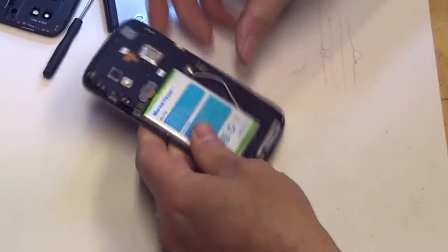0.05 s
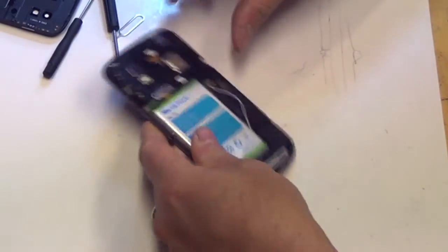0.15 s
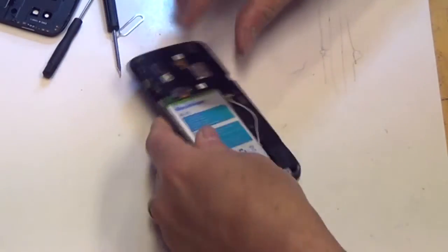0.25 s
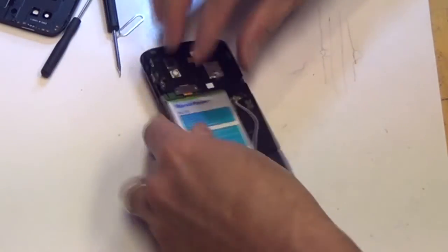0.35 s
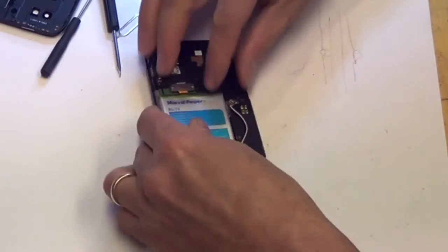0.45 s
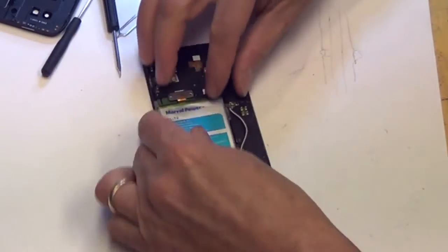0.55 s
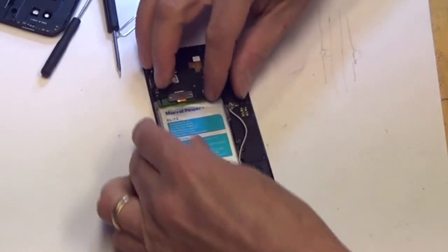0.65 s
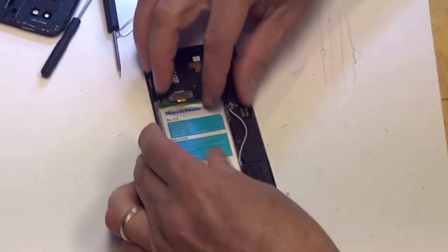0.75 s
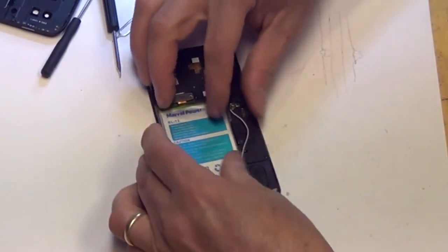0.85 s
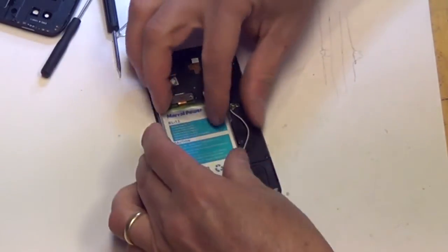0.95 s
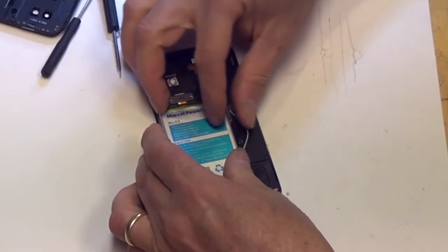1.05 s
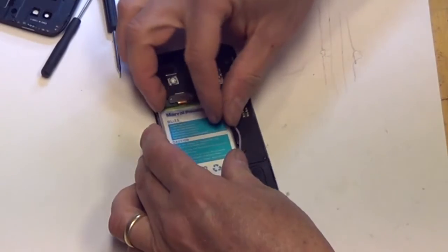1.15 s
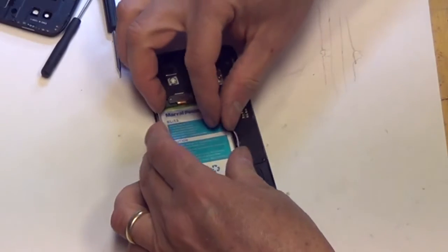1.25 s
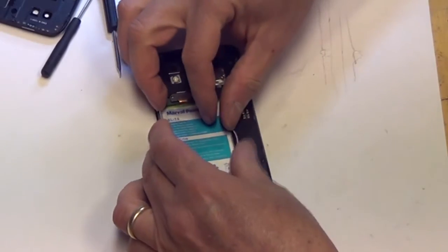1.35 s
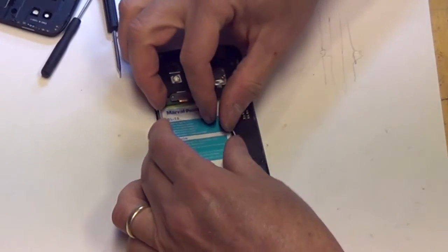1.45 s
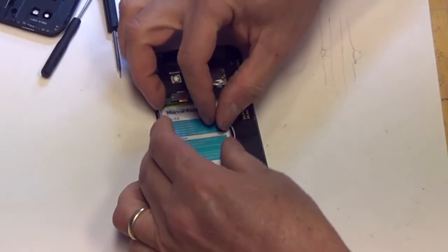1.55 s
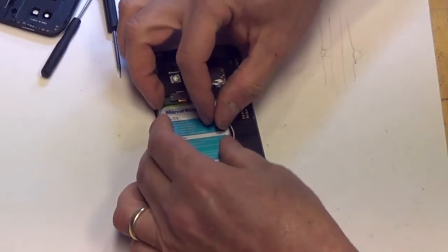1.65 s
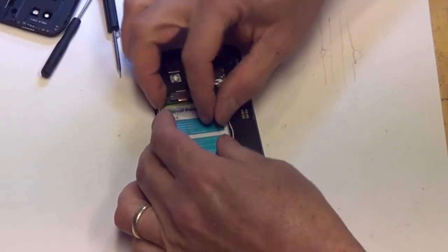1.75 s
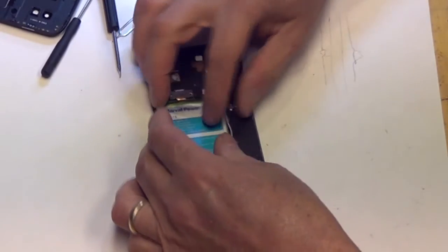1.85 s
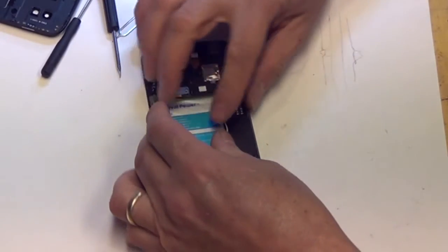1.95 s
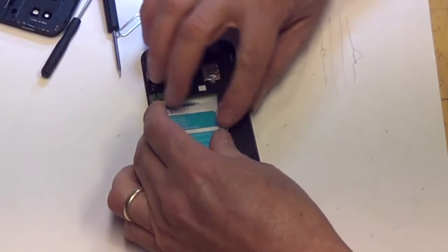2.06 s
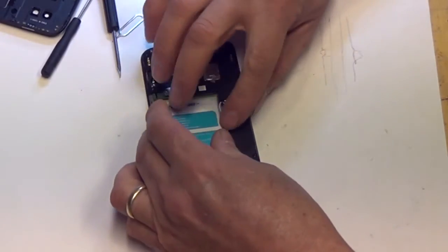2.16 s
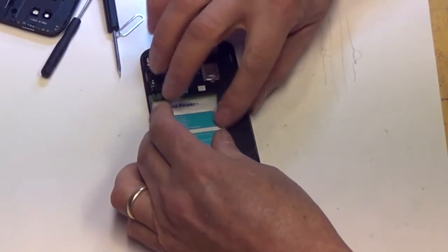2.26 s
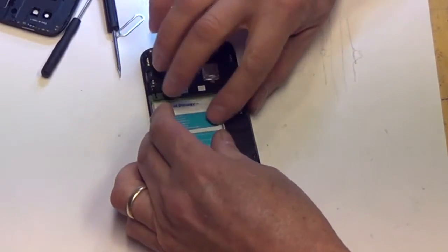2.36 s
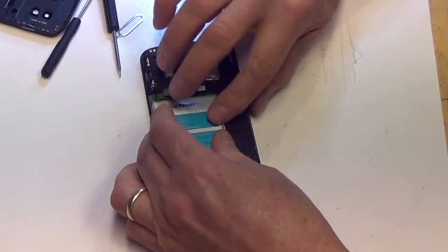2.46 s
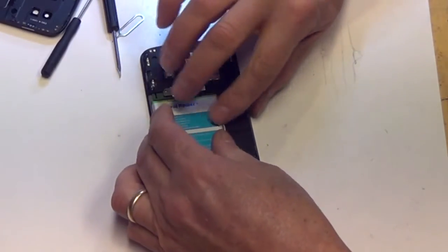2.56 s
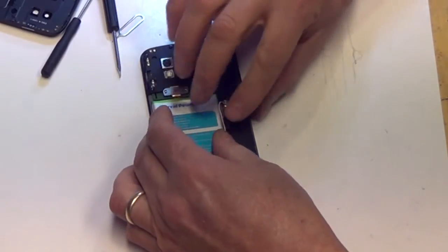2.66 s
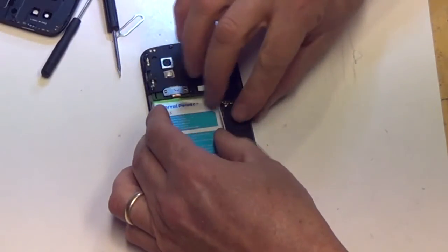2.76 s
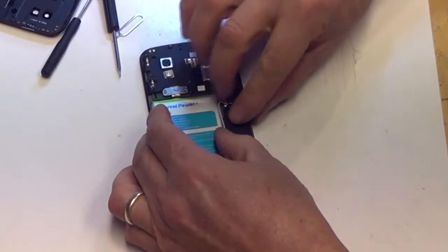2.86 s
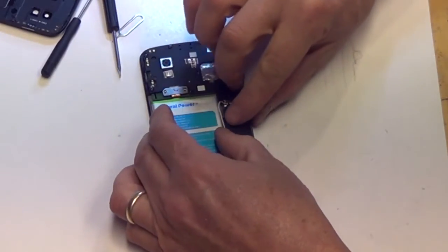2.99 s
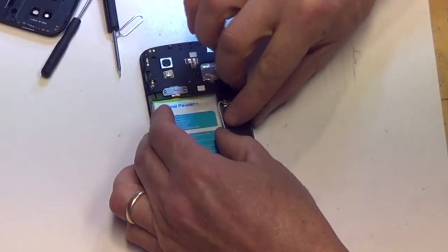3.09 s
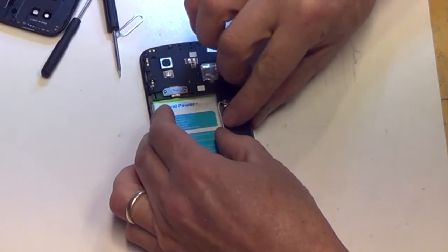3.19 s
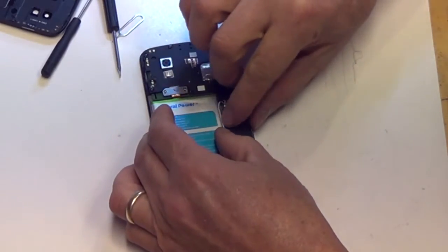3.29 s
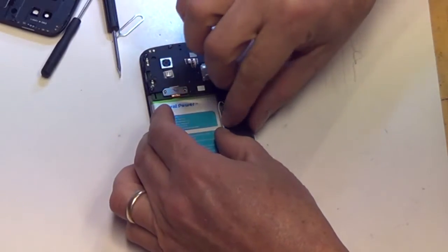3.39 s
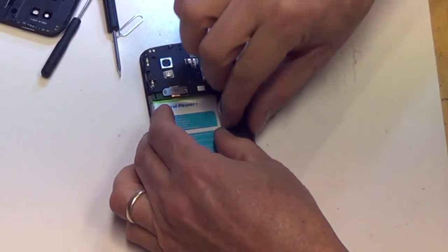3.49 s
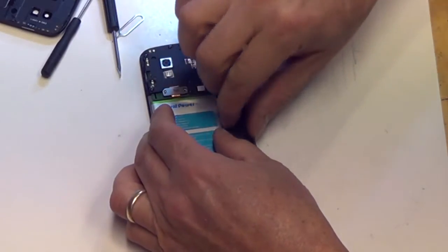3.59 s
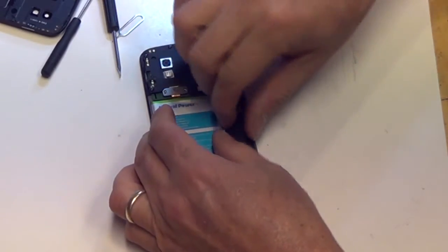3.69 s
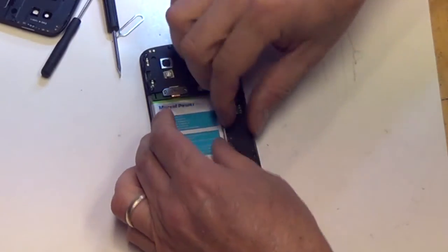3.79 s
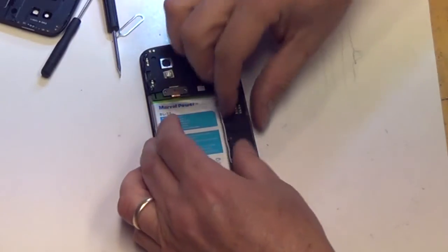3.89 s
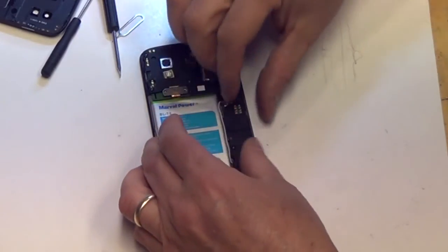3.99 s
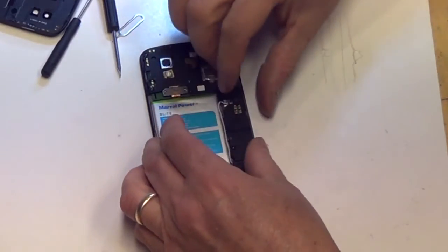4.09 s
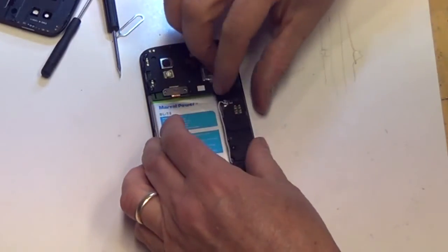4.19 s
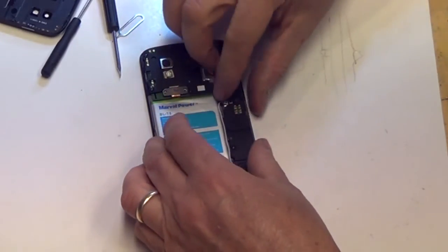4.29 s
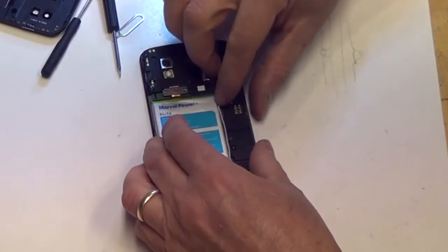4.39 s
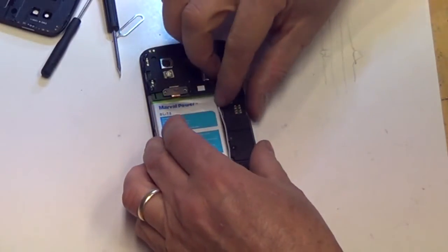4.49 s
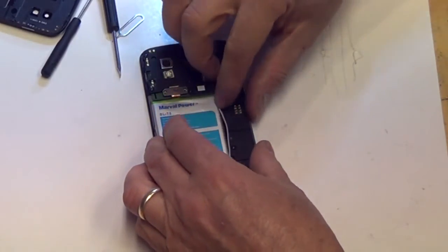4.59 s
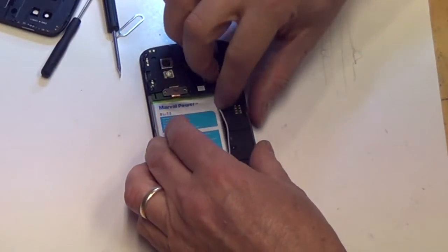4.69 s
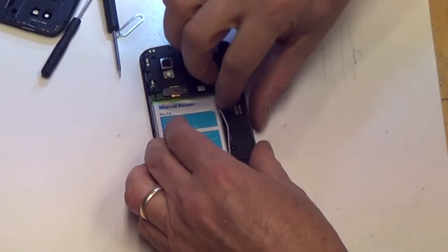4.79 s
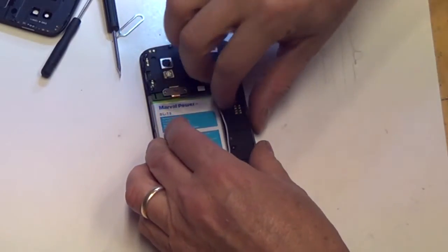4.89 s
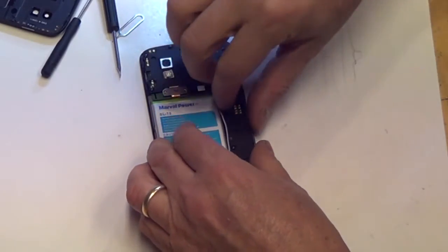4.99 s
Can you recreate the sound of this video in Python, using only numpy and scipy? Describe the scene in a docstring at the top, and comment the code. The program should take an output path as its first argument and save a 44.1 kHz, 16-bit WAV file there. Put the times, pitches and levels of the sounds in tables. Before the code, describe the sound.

Close view of hands working on an opened phone in a small room. Soft skin rubbing, then a light plastic clatter and low knock, and a louder clack with a woody thud as it lands. Sparse ticks and faint rubs follow, a bright crackling battery snap near two seconds, a dull bump and short scrape, then quiet ticks over faint hum and hiss.

```python
"""Fingers brush plastic over a faint hum, whine and buzz; then an opened phone touches a table and lands.
Its frame chatters at each meeting, the landing thuds and rocks, and later the battery snaps in among ticks.
Plastic: noise bursts through resonances. Table: decaying modes shaped by contact time. Skin: grainy noise.
Small-room echoes follow; the background is shaped noise, unsteady tones, beating whines and a pulsed tone."""
import sys
import numpy as np
from scipy import signal
from scipy.fft import rfft, irfft, next_fast_len
from scipy.io import wavfile
from scipy.ndimage import map_coordinates

SR = 44100
rng = np.random.default_rng(int(sys.argv[2]) if len(sys.argv) > 2 else 0)


def persist_wave(psi):
    """Save psi, clipped to +-1, as 16-bit WAV."""
    counts = np.round(np.clip(psi, -1, 1) * 32767).astype(np.int16)
    wavfile.write(sys.argv[1], SR, np.atleast_2d(counts).T)


N = 222218

# The phone is set down and chatters until it seats: (time [s], blow level [dB], first bounce level [dB],
# first flight [s], ratio of each flight to the last [1], contacts with the blow [count])
SET_DOWNS = [(0.2955, -25, -30.5, .0173, .52, 5), (0.6118, -22.5, -31.5, .0166, .59, 6)]
PRESS_DB = 1.92  # gain of each bounce over the last, as the hand bears down
# A contact's struck spot [Hz], burst t60 [s], catches relative to contact level [dB]
BLOW_HZ, BLOW_T60, BLOW_CATCH_DB = 3540, 0.018, -15.5
BOUNCE_HZ, BOUNCE_T60, BOUNCE_CATCH_DB = 4470, 0.0066, -9
# Fingernails and parts tick on the frame:
# (time [s], contact level [dB], catches relative to contact [dB], struck spot [Hz])
TICKS = [(0.2831, -36.5, -4, 3250), (0.5867, -57, 12.5, 5000), (.743, -44.5, -16, 4630),
         (.881, -48, 0, 6360), (1.3784, -47, 0.5, 3260), (1.8668, -44, -16, 2560),
         (2.351, -46.5, -18, 2450), (3.2203, -54, 7, 5050), (3.976, -52, 2, 5370), (4.809, -49.5, -5, 3200),
         (4.9639, -46, -1.5, 2170)]
TICK_T60 = 0.017  # s
# The battery snaps past its catches: (time [s], catch level [dB])
SNAPS = [(1.9804, -29), (2.0097, -18), (2.0254, -28.5)]
SNAP_HZ, SNAP_T60, SNAP_CONTACT_DB = 5400, 0.0024, -32.5  # same contact level under every snap
# Strained plastic crackles around each snap: nominal level, catches relative to it, time scale [s]
CREAK_DB, CREAK_CATCH_DB, CREAK_SPREAD_S = -48.5, -8, .012
# Resonances of the plastic frame: (centre [Hz], width [Hz], level [dB])
FRAME_RESONANCES = [(1410, 590, -4.5), (2350, 510, -4), (3190, 420, -2), (3930, 340, 0.5), (4480, 880, -1),
                    (5500, 710, 0), (8500, 8100, -10)]
# Resonances of the small stiff catches: (centre [Hz], width [Hz], level [dB])
CATCH_RESONANCES = [(1300, 700, -16), (2400, 1000, -15), (5400, 1900, -10), (8400, 1900, -.5),
                    (10200, 1500, 0), (12500, 1100, -4.5)]

# Blows to the table top, before the table's mix gain:
# (time [s], level [dB], contact time [s], share of the ring time that the hands leave [0-1])
THUDS = [(.2894, -33.5, .0016, .8), (.327, -25, .0114, .8), (2.4555, -39, .0035, .4),
         (2.4715, -31, .0052, .4), (4.8095, -43, .0024, .4)]
# The phone's full weight meets the table: time, level before the mix gain, contact time
LANDING_S, LANDING_DB, LANDING_CONTACT_S = .614, -16.5, 0.00077
ROCK_S, ROCK_LOSS_DB = .0348, 10.5  # rocking period, loss per swing
ROCK_TICK_DB = -28  # frame tick level before the loss of each swing
# Modes of the table with the phone on it: (frequency [Hz], level [dB], undamped t60 [s])
TABLE_MODES = [(88, -23, .42), (127, -20.5, .62), (139, -11, .14), (171, -13, .3), (200, -15, .38),
               (214, -17, .7), (240, -12, .28), (299, -10, .24), (332, -2, .11), (349, -2.5, .17),
               (411, -.5, .12), (439, -13, .13), (465, -8, .17), (545, -13, .15), (601, -13, .12),
               (651, -11, .17), (672, -16, .12), (864, -21, .16), (966, -24, .15), (1270, -17, .07),
               (1470, -11, .06), (1610, -6, .06)]
# Stereo lean of the table: (frequency [Hz], right minus left [dB])
TABLE_SIDE = [(60, 1), (120, 13), (200, 4), (330, 1.5), (700, 2), (1300, 2)]

# Fingertip strokes: (peak time [s], sum of rise and fall widths [s], skin hiss level [dB])
STROKES = [(0.066, 0.3, -53.5), (0.41, 0.33, -57.5), (0.79, 0.42, -63), (1.201, 0.026, -53),
           (1.95, 0.054, -59), (2.331, 0.023, -58), (2.672, .04, -62.5), (2.82, 0.33, -68.5),
           (3.219, 0.017, -49.5), (3.647, .12, -68.5), (3.869, 0.019, -51.5), (3.97, 0.29, -66.5)]
RISE_SHARE = 0.49  # rise width over that sum
# Scrape level at a reference hiss level, and its dB growth per dB of hiss
SCRAPE_DB, SCRAPE_AT_DB, SCRAPE_GROWS = -57.5, -52, 0.41
# Spectrum of skin hiss: (frequency [Hz], relative density [dB per Hz])
SKIN_SPECTRUM = [(1500, -26), (3000, -15), (5000, -3.5), (7000, -12.5), (8800, -6), (10600, -2),
                 (11800, -7), (13000, -11), (15000, -17.5)]
# Resonances of a rubbed frame: (centre [Hz], width [Hz], level [dB])
SCRAPE_RESONANCES = [(1780, 420, 1.5), (3080, 510, 0), (4380, 370, -3.5), (5380, 510, -1),
                     (8900, 12000, -5.5)]
# Resonances of the phone's back on the table: (centre [Hz], width [Hz], level [dB])
SLIDE_RESONANCES = [(1490, 200, 9), (1720, 190, 3), (3040, 150, 1)]

# Decay of the room: (frequency [Hz], t60 [s])
ROOM_DECAY = [(100, 1), (400, 0.51), (2000, 0.44), (6000, 0.2), (14000, 0.13)]
# A faint pulsing electronic buzz: (start [s], end [s], tone [Hz], level [dB rms])
BUZZES = [(0, 1.62, 2815, -71.5), (2.35, 4.4, 3073, -76.5)]
BUZZ_RATE = 30  # pulses per second
# Tones of the room's appliances: (frequency [Hz], level [dB rms], left minus right [dB])
HUM = [(63.7, -80, -6), (120.8, -68.5, -1), (178.5, -81.5, 4), (319, -77, 5), (496, -77.5, -10),
       (570.8, -65.5, -5.5), (631.7, -68.5, -5), (696, -72, -3), (1965, -79.5, 3.5)]
WHINE_HZ, BEAT_HZ, WHINE_DB = 15734.3, 12.9, -62.5  # level [dB rms] of the stronger whine
# Room air and microphone hiss: (frequency [Hz], relative density [dB per Hz])
AIR_SPECTRUM = [(15, -61), (25, -24), (49, -12), (91, -12), (115, -7), (147, -9), (357, -9.5), (479, -8.5),
                (519, -16.5), (563, -7), (756, -13.5), (1230, -15), (10500, -25), (14100, -24.5),
                (15300, -18.5)]
AIR_DB = -56  # dB rms before the stereo lean
# Likeness of the two sides of the air: (frequency [Hz], left-right correlation [0-1])
AIR_LIKENESS = [(30, 0.21), (100, 0.29), (300, 0.91), (700, 0.85), (2000, 1), (12000, 1)]
# Stereo lean of the air: (frequency [Hz], right minus left [dB])
AIR_SIDE = [(110, 1), (200, 2.5), (380, 4.5), (700, 0), (1300, 1), (3000, 0)]

# Opposite phase shifts of the two microphone ports: (frequency [Hz], shift [dB re 1 radian])
PORT_PHASE = [(1500, -42), (2800, -15.5), (4000, -51), (5200, -17), (6200, -10), (7600, -9.5), (9500, -23),
              (13000, -36)]
TOP_HZ = 15900  # band limit


def clicks(first_slip=0.16, frame_db=-4.0, spot_db=-7.0, spot_t60=0.0036):
    """Impact excitation: a sharp slip and decaying micro-impacts ring struck spot, frame and catches."""
    frame, catches, spots = np.zeros(N), np.zeros(N), np.zeros(N)
    t = np.arange(SR // 20) / SR
    for s, contact_db, catch_db, t60, hz in contacts():
        decay = fade(t, t60)
        size = np.linalg.norm(decay)
        bursts = decay * rng.standard_normal((3, len(t)))
        bursts[:, 0] = first_slip * size
        spot_ring = np.sin(2 * np.pi * hz * t) * fade(t, spot_t60)
        bursts[2] = signal.fftconvolve(bursts[2], spot_ring)[:len(t)]
        for track, db, burst in zip((frame, catches, spots), (frame_db, catch_db, spot_db), bursts):
            add(track, s, amp(contact_db + db) * size * burst / np.linalg.norm(burst))
    return resonate(frame, FRAME_RESONANCES) + resonate(catches, CATCH_RESONANCES) + spots


def contacts():
    """Superposition of hard contacts: (time s, level dB, relative catch dB, burst t60 s, spot Hz)."""
    rocks = [(s, ROCK_TICK_DB + db, BOUNCE_CATCH_DB, BOUNCE_T60, BOUNCE_HZ) for s, db in rocking()[1:]]
    ticks = [(s, db, catch_db, TICK_T60, hz) for s, db, catch_db, hz in TICKS]
    snaps = [(s, SNAP_CONTACT_DB, db - SNAP_CONTACT_DB, SNAP_T60, SNAP_HZ) for s, db in SNAPS]
    return chatter() + rocks + ticks + snaps + creak()


def chatter():
    """Inelastic bouncing: flights shorten geometrically while the pressing hand strengthens each bounce."""
    rows = []
    for s, db, bounce_db, flight, ratio, count in SET_DOWNS:
        rows.append((s, db, BLOW_CATCH_DB, BLOW_T60, BLOW_HZ))
        for k in range(round(count) - 1):
            s = s + flight * ratio ** k
            rows.append((s, bounce_db + k * PRESS_DB, BOUNCE_CATCH_DB, BOUNCE_T60, BOUNCE_HZ))
    return rows


def rocking(count=4):
    """Damped rocking: the landing, then evenly spaced weaker swings (time s, dB relative to landing)."""
    return [(LANDING_S + k * ROCK_S, -k * ROCK_LOSS_DB) for k in range(count)]


def creak(count=5):
    """Stick-slip under strain: tiny slips at chance moments around each snap as the battery is forced in."""
    rows = []
    for s, _ in SNAPS:
        for when, size, spot in rng.uniform(-1.3, 1, (count, 3)):
            hz = SNAP_HZ * np.exp(0.43 * spot)
            rows.append((s + CREAK_SPREAD_S * when, CREAK_DB + 4 * size, CREAK_CATCH_DB, TICK_T60, hz))
    return rows


def thuds():
    """Modal excitation: blows ring the table's modes, and a longer contact weakens the high ones."""
    top, t = np.zeros(N), np.arange(SR) / SR
    hz, level, t60 = np.transpose(TABLE_MODES)[:, :, None]
    attack = 1 - np.exp(-t / .001)
    landing = [(s, LANDING_DB + db, LANDING_CONTACT_S, 1) for s, db in rocking()]
    for s, db, contact, free in THUDS + landing:
        strength = amp(level + .5 * rng.standard_normal(hz.shape))
        strength = strength / np.hypot(1, (hz * contact) ** 2)
        ring = np.sum(strength * np.sin(2 * np.pi * hz * t) * fade(t, t60 * free), axis=0)
        add(top, s, -amp(db) * attack * ring)
    # the board radiates almost nothing below its first mode
    return signal.sosfilt(signal.butter(6, 78, "highpass", fs=SR, output="sos"), top)


def rubbing(grain_db=1.5):
    """Stick-slip friction: catching skin ridges give a grainy hiss and a scrape through the frame."""
    power = np.zeros((2, N))
    for s, length, db in STROKES:
        levels = amp([[db], [SCRAPE_DB + SCRAPE_GROWS * (db - SCRAPE_AT_DB)]])
        power += (levels * swell(s, RISE_SHARE * length, (1 - RISE_SHARE) * length)) ** 2
    hiss, scrape = np.sqrt(power)
    grip = amp(grain_db * wobble(600) + 1.1 * wobble(45))
    skin = filtered(grip * rng.standard_normal(N), lambda hz: amp(along(SKIN_SPECTRUM, hz)))
    frame = resonate(grip * rng.standard_normal(N), SCRAPE_RESONANCES)
    return hiss * unit(skin) + scrape * unit(frame)


def slide(groan_db=-61, rustle_db=-63):
    """Sliding friction: the pressed phone shifts on the table, a dull scrape that thins to a rustle."""
    groan = swell(s=2.485, rise=0.024, fall=0.045) * resonate(rng.standard_normal(N), SLIDE_RESONANCES)
    rustle = swell(s=2.535, rise=.028, fall=0.021) * resonate(rng.standard_normal(N), [(4420, 750, 0)])
    return amp(groan_db) * groan + amp(rustle_db) * rustle


def near_echoes(x, t60=0.072):
    """Early scattering: quick dense echoes between the hands, the table and the camera."""
    t = np.arange(SR // 8) / SR
    tail = rng.standard_normal(len(t)) * fade(t, t60) * (1 - np.exp(-t / 0.00066))
    return signal.fftconvolve(x, tail / np.linalg.norm(tail))[:N]


def room(x, delay=0.0047, width=0.022):
    """Diffuse reverberation: wall echoes decay by frequency; width sets how far the two sides differ."""
    hz, t, z = signal.stft(rng.standard_normal((2, SR // 2)), SR, nperseg=256)
    tail = signal.istft(z * fade(t, along(ROOM_DECAY, hz)[:, None]), SR, nperseg=256)[1]
    tail *= 1 - np.exp(-(np.arange(tail.shape[1]) / SR / delay) ** 2)  # gradual onset
    mid, side = signal.fftconvolve(x[None], tail / np.linalg.norm(tail[0]), axes=1)[:, :N]
    return np.array([mid + width * side, mid - width * side])


def buzz(jitter=0.39):
    """Amplitude modulation: a thin tone of unsteady phase pulses at an even rate."""
    t = np.arange(N) / SR
    pulses = np.sin(np.pi * BUZZ_RATE * t) ** 4
    total = np.zeros(N)
    for start, end, hz, db in BUZZES:
        tone = np.sin(2 * np.pi * hz * t + jitter * wobble(60))
        total += amp(db) * ((t > start) & (t < end)) * unit(pulses * tone)
    return total


def appliances(drift=0.47, ripple=0.091):
    """Phase drift and beating: unsteady hum lines, and two close whines that ripple at the mains rate."""
    t = np.arange(N) / SR

    def tone(hz, phase=0):
        """Harmonic motion: a sine at rms 1."""
        return np.sqrt(2) * np.sin(2 * np.pi * hz * t + phase)

    hum = 0
    for hz, db, left_db in HUM:
        phase = drift * wobble(3.92) + rng.uniform(0, 2 * np.pi)
        hum = hum + panned(amp(db) * tone(hz, phase), -left_db)
    mains = tone(60) + .5 * tone(300) + .5 * tone(360)
    whine = tone(WHINE_HZ) + .5 * tone(WHINE_HZ + BEAT_HZ)
    return hum + amp(WHINE_DB) * whine * (1 + ripple * mains)


def air():
    """Partly coherent noise: mid and side shares set the likeness of room noise and microphone hiss."""
    def colour(hz):
        """Coherence as an angle between mid and side."""
        turn = np.arccos(np.clip(along(AIR_LIKENESS, hz), -1, 1)) / 2
        return amp(along(AIR_SPECTRUM, hz)) * [np.cos(turn), np.sin(turn)]

    mid, side = filtered(rng.standard_normal((2, N)), colour)
    return amp(AIR_DB) * unit(np.array([mid + side, mid - side]))


def amp(db):
    """Logarithmic level: decibels to gain."""
    return 10 ** (np.asarray(db) / 20)


def unit(x):
    """Power normalisation: x at rms 1."""
    return x / np.sqrt(np.mean(x ** 2) + 1e-20)


def along(points, hz):
    """Logarithmic frequency: (Hz, value) points interpolated on a log axis."""
    f, v = np.transpose(points)
    return np.interp(np.log(hz + 1), np.log(f + 1), v)


def fade(t, t60):
    """Exponential decay: a loss of 60 dB in t60 seconds."""
    return np.exp(-np.log(1000) * t / np.maximum(t60, 1e-4))


def swell(s, rise, fall):
    """Two-sided Gaussian envelope: peak at time s, widths rise and fall in seconds."""
    t = np.arange(N) / SR - s
    return np.exp(-.5 * (t / np.where(t < 0, rise, fall)) ** 2)


def wobble(rate):
    """Band-limited fluctuation: a smooth random curve with rate knots a second."""
    return map_coordinates(rng.standard_normal(int(N * rate / SR) + 4), [np.arange(N) * rate / SR])


def filtered(x, response):
    """Linear filtering: the spectrum of x times a complex response of frequency."""
    m = next_fast_len(N + SR // 2)
    return irfft(rfft(x, m) * response(np.fft.rfftfreq(m, 1 / SR)), m)[..., :N]


def resonate(x, peaks):
    """Parallel resonance: a bank of alternating sign that keeps the power of white noise."""
    def response(f):
        """Second-order resonance, summed over the peaks."""
        total = 0
        for k, (centre, width, db) in enumerate(peaks):
            damping = 1j * f * width
            total = total + (-1) ** k * amp(db) * damping / (centre * centre - f * f + damping)
        return total / np.sqrt(np.mean(abs(total) ** 2))

    return filtered(x, response)


def add(track, s, sound):
    """Superposition: mix a sound into a track at time s."""
    part = track[round(s * SR):][:len(sound)]
    part += sound[:len(part)]


def panned(x, right_db):
    """Level difference: mono to stereo, the right side louder by right_db."""
    return x * amp([[-right_db / 2], [right_db / 2]])


def leaning(x, side):
    """Level difference by frequency: lean right by (Hz, dB) points; the two gains sum to 2."""
    return filtered(x, lambda hz: 2 / (1 + amp(along(side, hz) * np.array([[1], [-1]]))))


def scene():
    """Superposition: plastic, table and fingers in the room, over its background."""
    plastic, fingers = clicks(), rubbing() + slide()
    close = plastic + amp(-5.0) * near_echoes(plastic) + fingers
    walls = amp(-9) * room(plastic + fingers)
    table = amp(-5) * thuds()
    table_walls = amp(-20) * room(table, delay=.015, width=.3)
    struck_table = leaning(table + table_walls, TABLE_SIDE)
    background = leaning(air(), AIR_SIDE) + appliances() + buzz()
    return close + walls + struck_table + background


def record(dry):
    """Phase difference and band limit: two unlike ports, and a camera that keeps nothing above TOP_HZ."""
    def ports(hz):
        """Pure phase shift, opposite at the two ports."""
        return np.exp(1j * amp(along(PORT_PHASE, hz)) * np.array([[1], [-1]]))

    return filtered(dry, lambda hz: ports(hz) * (hz < TOP_HZ))


dry = scene()
out = record(dry)
persist_wave(out)
```